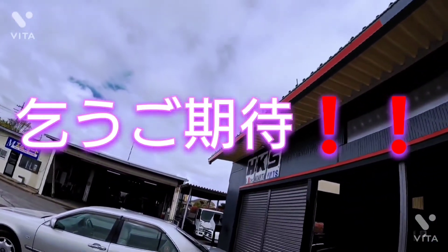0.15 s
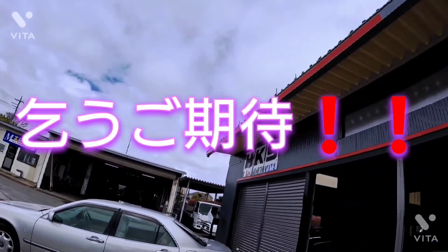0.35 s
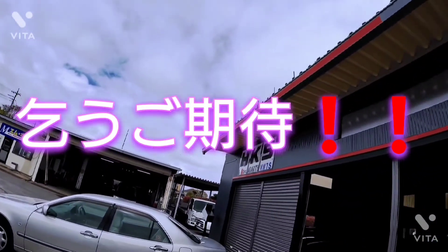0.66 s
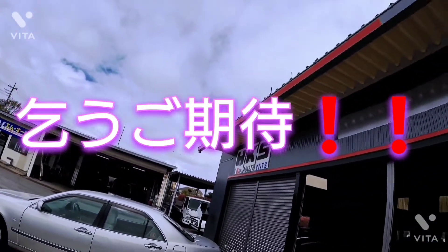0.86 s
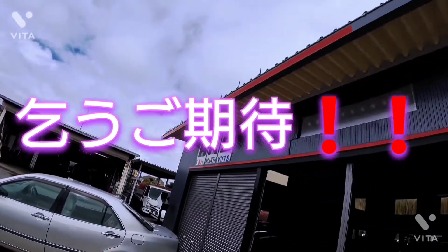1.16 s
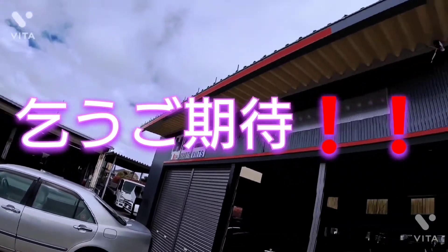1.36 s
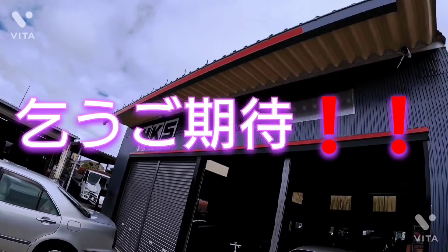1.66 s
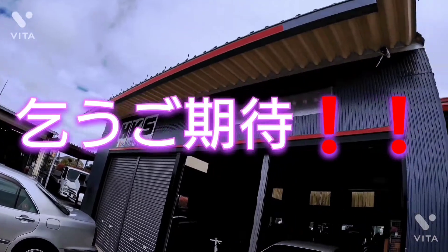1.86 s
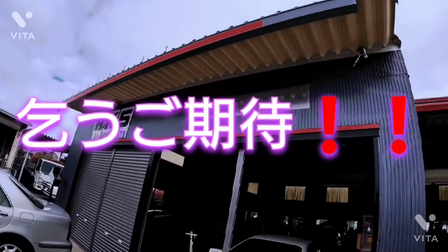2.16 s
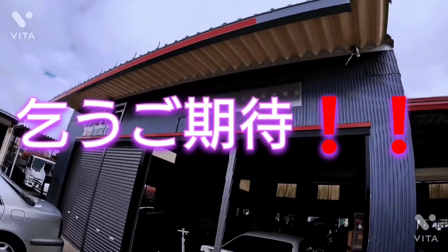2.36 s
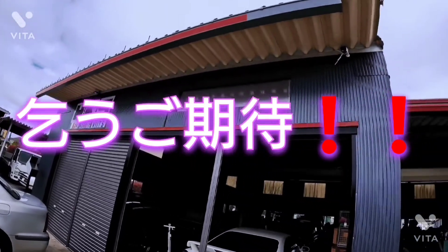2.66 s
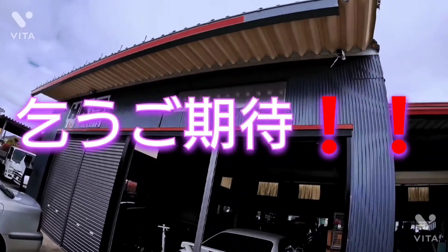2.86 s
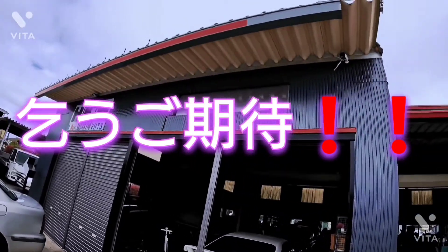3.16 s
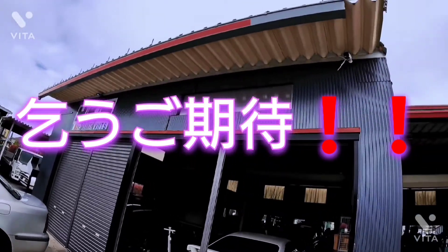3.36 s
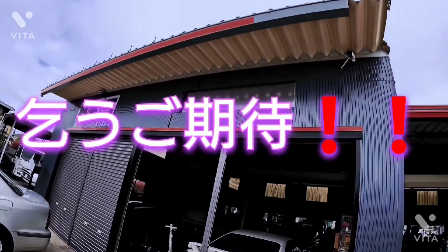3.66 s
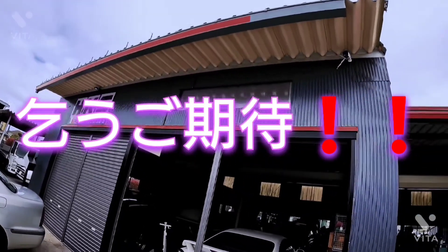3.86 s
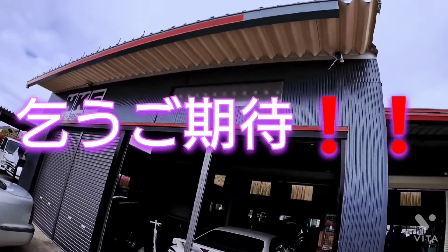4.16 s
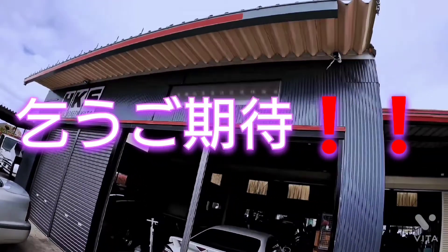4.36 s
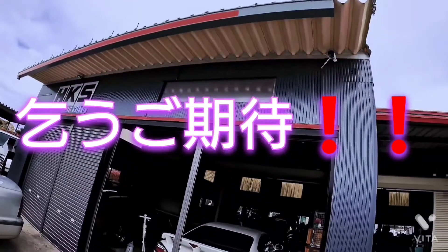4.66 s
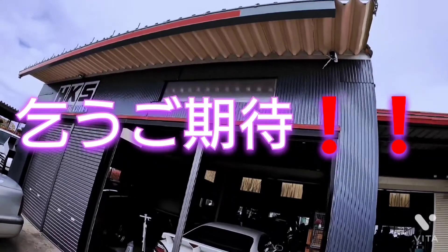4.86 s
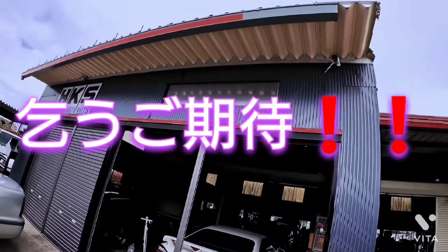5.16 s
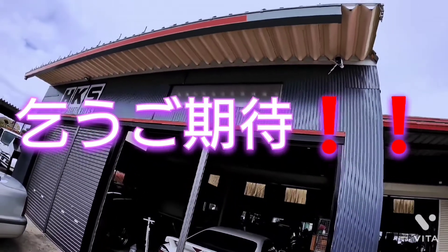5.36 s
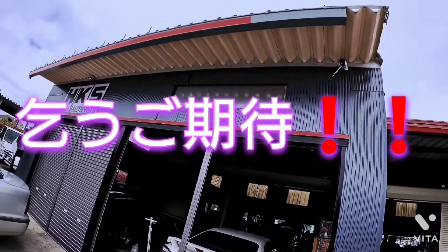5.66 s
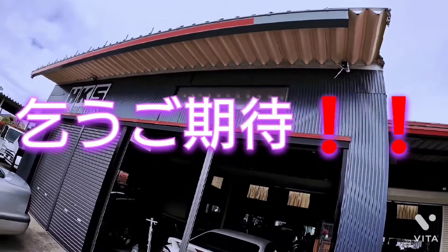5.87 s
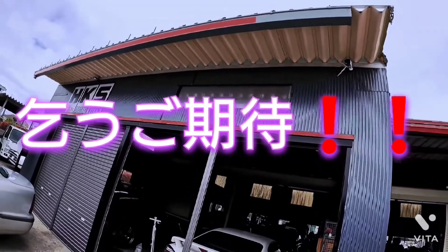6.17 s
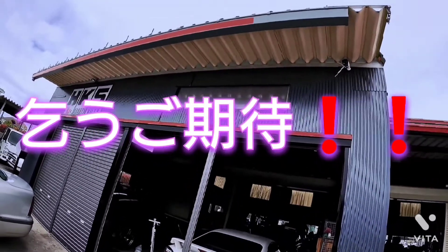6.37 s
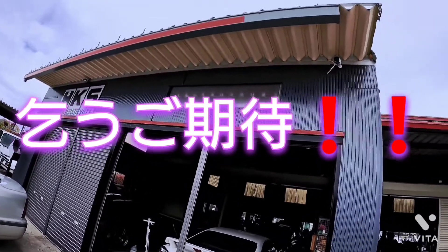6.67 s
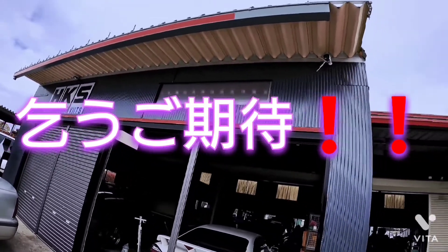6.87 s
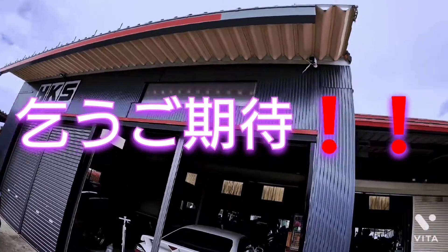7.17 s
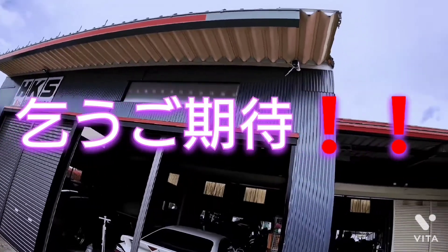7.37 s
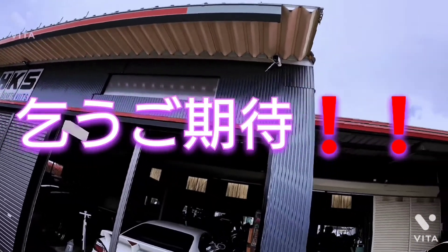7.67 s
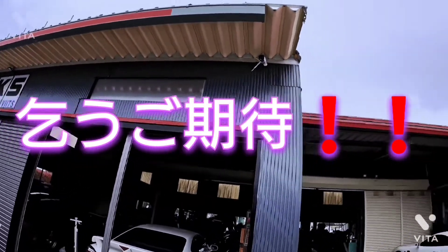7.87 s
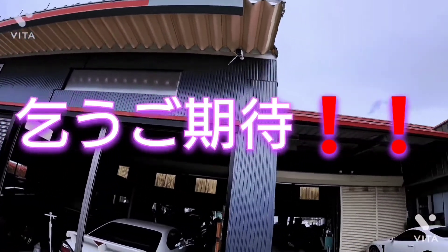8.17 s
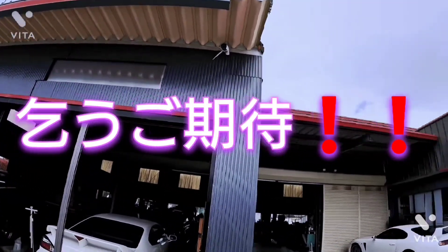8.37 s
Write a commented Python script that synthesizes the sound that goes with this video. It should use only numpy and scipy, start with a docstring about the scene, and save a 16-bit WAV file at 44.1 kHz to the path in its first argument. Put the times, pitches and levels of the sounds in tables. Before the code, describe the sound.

A car engine idles throughout, outdoors by a workshop, with a deep, even hum. Above it, quieter and slightly to the left, are a thin belt whine, ticking valves, a rushing fan and a light rattle that is clearest in the first two seconds. Short, soft hisses come at about 0.4 and 1.1 seconds, with fainter ones near 6.2 and 7.5 seconds. Wind is faint at first, bumping the microphone gently around 1.2 seconds. From about 5.3 seconds it buffets in irregular low rumbles and thumps, mostly on the right. Strong gusts with small snaps hit at about 6.4 seconds, from 7.2 to 7.8, and hardest around 8.1 to 8.2. The engine dips slightly under these gusts but keeps running. A soft swish passes at about 8.3 seconds, and the hum swells a little just before the end at 8.5 seconds.

```python
"""A deep firing hum: a six-cylinder car engine idles, with exhaust orders, belt whine, a rattling cover,
ticking valve gear and fan rush. Short hisses come early and twice more later. Wind, faint at first,
buffets the two microphone ports, the right one most: eddies rumble, thump and snap on the membrane,
and the gain control ducks under them. A soft swish comes near the end."""
import sys
import numpy as np
from scipy import signal
from scipy.fft import rfft, irfft, next_fast_len
from scipy.io import wavfile
from scipy.ndimage import uniform_filter1d, map_coordinates

SR = 44100
rng = np.random.default_rng(int(sys.argv[2]) if len(sys.argv) > 2 else 0)


def to_wav(s):
    """Save 16-bit WAV."""
    ch = np.atleast_2d(s).T  # columns
    pcm = np.round(np.clip(ch, -1, 1) * 32767)  # PCM
    wavfile.write(sys.argv[1], SR, pcm.astype(np.int16))


N = 375732


def amp(db):
    """dB to linear gain."""
    return 10 ** (np.asarray(db) / 20)


def unit_rms(x):
    """x at rms 1."""
    return x / np.sqrt(np.mean(x ** 2) + 1e-20)


def log_interp(points, hz):
    """Interpolate (freq_hz, value) rows on a log frequency axis."""
    freq_hz, values = np.transpose(points)
    return np.interp(np.log(hz + 1), np.log(freq_hz + 1), values)


def curves(rows):
    """One per-sample curve for each column after time_s."""
    time_s, *columns = np.transpose(rows)
    return [np.interp(np.arange(N) / SR, time_s, column) for column in columns]


def wobble(rate_hz):
    """Smooth random curve, rate_hz knots a second."""
    knots = rng.standard_normal(int(N * rate_hz / SR) + 4)
    coarse = np.arange(0, N + 64, 64)
    return np.interp(np.arange(N), coarse, map_coordinates(knots, [coarse * rate_hz / SR]))


def filtered(x, response):
    """Apply a complex response(hz); ends mirrored."""
    edge = SR // 4
    size = next_fast_len(N + 2 * edge)
    spectrum = rfft(np.pad(x, [(0, 0), (edge, edge)], "reflect"), size)
    return irfft(spectrum * response(np.fft.rfftfreq(size, 1 / SR)), size)[..., edge:edge + N]


def noise(spectrum, patchy_db):
    """Two independent shaped noises, rms 1, sharing time-frequency patches of random gain."""
    bins = signal.stft(rng.standard_normal((2, N)), nperseg=512)[2]
    patches = rng.standard_normal(bins.shape[1:])
    patches = uniform_filter1d(uniform_filter1d(patches, size=5, axis=0), size=5, axis=1)
    pair = signal.istft(bins * amp(patchy_db * unit_rms(patches)), nperseg=512)[1][:, :N]
    return unit_rms(filtered(pair, lambda hz: amp(log_interp(spectrum, hz))))


def resonate(x, modes):
    """Pass x twice through a resonator bank for steep skirts; rms 1."""
    def bank(hz):
        return sum(amp(db / 2) * 1j * hz * width_hz / (pitch_hz ** 2 - hz ** 2 + 1j * hz * width_hz)
                   for pitch_hz, width_hz, db in modes)
    return unit_rms(filtered(x, lambda hz: bank(hz) ** 2))


# freq_hz, left_right_coherence
COHERENCE = [(60, 1.0), (130, 1), (280, 0.97), (600, 0.87), (1300, 0.74), (2810, 0.57), (4500, 0.51),
             (6070, 0.95), (8500, 0.95), (13100, 0.93)]
# freq_hz, left_over_right_db
BALANCE = [(60, 2), (200, .5), (360, 1), (660, 2), (1200, 3.5), (2180, 4.5), (3960, 1.5), (7200, 1.5),
           (10500, 0), (12000, 31), (13600, 18)]
# freq_hz, left_lead_rad
PHASE_LEAD = [(100, 0), (600, -0.08), (1210, -0.55), (2410, -0.8), (3700, -0.25), (4650, .4), (5300, 0)]
def from_left(pair):
    """Source on the left: shared and diffuse parts, then level and phase gaps between the ports."""
    def blend(hz):
        angle = np.arccos(np.clip(log_interp(COHERENCE, hz), 0, 1)) / 2
        return np.array([np.cos(angle), np.sin(angle)])

    def gaps(hz):
        left = amp(log_interp(BALANCE, hz) / 2) * np.exp(.5j * log_interp(PHASE_LEAD, hz))
        return np.array([left, 1 / left])

    mid, side = filtered(pair, blend)
    return filtered(np.array([mid + side, mid - side]), gaps)


# shaft_order, level_db
EXHAUST_ORDERS = [(6, -60.5), (7, -54.5), (9, -55.5), (11, -64.5), (12, -61.5), (15, -60.5), (21, -57),
                  (22, -56), (24, -61), (30, -69.5), (33, -66.5), (36, -66.5), (39, -72.5), (42, -68.5),
                  (44, -69.5)]
def hum_and_exhaust(turns, hum_db):
    """Three firings a shaft turn give the hum; the exhaust orders trail them."""
    lead_turns, lag_turns = .048, .24
    gain = amp(hum_db + 1.2 * wobble(9))
    tones = gain * np.sin(2 * np.pi * 3 * (turns + lead_turns) + .1 * wobble(6))
    for order, level_db in EXHAUST_ORDERS:
        gain = amp(level_db + 1.8 * wobble(4))
        tones += gain * np.sin(2 * np.pi * order * (turns - lag_turns) + .35 * wobble(3))
    return np.sqrt(2) * tones


# pitch_hz, width_hz, level_db
BELT_MODES = [(908, 36, -8), (1085, 30, -8), (1165, 14, -7), (1184, 14, -3), (1228, 15, 0), (1245, 12, -1),
              (1274, 12, -2.5), (1384, 15, -8), (1427, 15, -6), (1498, 16, -3.5), (1700, 34, -8),
              (1918, 30, -8), (2136, 30, -8.5), (2270, 20, -11), (2376, 26, -9), (2590, 32, -14),
              (2858, 30, -12.5), (3101, 36, -12), (3750, 34, -14), (4027, 26, -13)]
def belt_whine(turns, firing, uneven):
    """Belt-driven parts sing; the belt tightens once a turn. Uneven running fades the whine."""
    tension = np.cos(2 * np.pi * (turns - .2))
    level_db = -2 - 1.75 * firing + uneven * (3 * tension - 14)
    white = noise([(100, 0)], patchy_db=1.5)
    return amp(level_db) * resonate(white, BELT_MODES)


# level_db at each sixth of a shaft turn, for unevenness 1
BLOW_DB = [0, -13, -6, -15, -15, -15]
# pitch_hz, width_hz, level_db
COVER_MODES = [(1225, 40, 0), (2378, 70, -20), (4025, 100, -25)]
# pitch_hz, width_hz, level_db
VALVE_MODES = [(2378, 60, 0), (2790, 70, -7), (3120, 70, -7), (3750, 70, -9), (4030, 60, -10)]
def rattle(turns, uneven, modes):
    """Six blows a turn ring a part through its like-tuned bracket; the walls return each blow."""
    jitter_s, echo_s = .001, .004
    step = ((turns + .94) * len(BLOW_DB)).astype(int)
    onsets = np.flatnonzero(np.diff(step))
    force_scatter, time_scatter, echo_scatter = rng.standard_normal((len(onsets), 3)).T
    pattern_db = np.take(BLOW_DB, step[onsets + 1] % len(BLOW_DB))
    force = amp(uneven[onsets] * pattern_db + .9 * force_scatter)
    force /= np.sqrt(uniform_filter1d(force ** 2, size=12))
    direct = np.clip(onsets + (jitter_s * SR * time_scatter).astype(int), 0, N - 1)
    echo = np.clip(direct + (echo_s * SR * (1 + .322 * echo_scatter)).astype(int), 0, N - 1)
    blows = np.array([np.bincount(direct, force, N), np.bincount(echo, force, N)])
    return resonate(blows, modes)


# freq_hz, density_db
FAN_SPECTRUM = [(290, -20), (500, -10), (757, -10.5), (845, -15.5), (905, -6.5), (1030, -7), (1260, -4.5),
                (1350, -8.5), (1470, -8.5), (2350, -13), (3500, -16), (3950, -17.5), (4200, -20.5),
                (4880, -26), (6520, -21), (12500, -44), (13600, -42.5)]
def fan_rush(firing, treble_db):
    """Fan and engine bay noise; the treble pulses with the valve gear."""
    def highpass(hz, corner_hz=4000):
        return hz ** 2 / (hz ** 2 + corner_hz ** 2)

    low = filtered(noise(FAN_SPECTRUM, patchy_db=1.5), lambda hz: 1 - highpass(hz))
    treble = filtered(noise(FAN_SPECTRUM, patchy_db=3), highpass)
    pulse = amp(treble_db + 1.5 * firing + .6 * wobble(6) + .66 * wobble(14))
    return low + pulse * treble


# freq_hz, density_db
DRONE_SPECTRUM = [(18, -27), (30, -7.5), (52, -14), (81, -21.5), (134, -23.5), (184, -22.5), (232, -26.5),
                  (425, -35.5), (642, -45.5), (800, -35), (1040, -90), (1760, -120)]
def body_drone(firing):
    """Low exhaust and body noise that puffs with each firing."""
    return amp(-44 + 1.5 * firing + .6 * wobble(12)) * noise(DRONE_SPECTRUM, patchy_db=1.5)


# time_s, firing_hz
FIRING_RATE = [(0, 25.3), (.6, 25.5), (1, 25.64), (2.4, 25.62), (2.8, 25.2), (3.8, 25.25), (4.2, 25.45),
               (5.4, 25.4), (5.8, 25.05), (6.4, 25.1), (7, 25.4), (8.52, 25.2)]
# time_s, hum_db, rush_db, treble_re_rush_db, unevenness
ENGINE_MIX = [(0, -30, -53.5, 0.5, 0.42), (.6, -31, -51.5, 0, 1.23), (2, -30, -51, -1, 0.83),
              (2.4, -28.5, -51.5, 0.5, 0.25), (3.7, -28.5, -51, 0.5, 0.24), (5.2, -29, -50.5, 2, 0.21),
              (6.3, -28.5, -50.5, 1.5, 0.22), (7.5, -28.5, -49.5, -0.5, 0.39), (7.75, -30, -52.5, 1, 0.52),
              (8.1, -27.5, -53, 2.5, 0.46), (8.52, -24.5, -50.5, -5.5, 0.7)]
def engine():
    """Idling six-cylinder: one shaft angle drives every part."""
    hum_db, rush_db, treble_db, uneven = curves(ENGINE_MIX)
    firing_hz, = curves(FIRING_RATE)
    turns = .057 + np.cumsum(firing_hz) / SR / 3
    firing = np.cos(2 * np.pi * 3 * turns)
    hum = hum_and_exhaust(turns, hum_db)
    whine = belt_whine(turns, firing, uneven)
    cover = amp(-15.5 + 9 * uneven) * rattle(turns, uneven, COVER_MODES)
    valves = amp(-19) * rattle(turns, np.full(N, 1.1), VALVE_MODES)
    bay = amp(rush_db) * (whine + cover + valves + fan_rush(firing, treble_db))
    return hum + from_left(bay + body_drone(firing))


# freq_hz, density_db
HISS_SPECTRUM = [(1200, -35), (2300, 1), (3500, 4), (5500, 0.5), (7500, 1.5), (10000, -4.5), (13600, -10)]
# start_s, hold_s, t60_s, level_db
HISS_BURSTS = [(0.39, 0.037, 0.32, -52.5), (.455, 0.049, 0.087, -64), (1.143, .03, 0.44, -58.5),
               (6.19, .03, .36, -65), (7.507, .03, 0.28, -62.5)]
def hisses():
    """Bright noise bursts: quick attack, hold, fast decay."""
    attack_s = .01
    t, envelope = np.arange(N) / SR, np.zeros(N)
    for start_s, hold_s, t60_s, level_db in HISS_BURSTS:
        gate = np.clip((t - start_s) / attack_s, 0, 1) * (t < start_s + 1)
        envelope += gate * amp(level_db - 60 * np.clip(t - start_s - hold_s, 0, 1) / t60_s)
    shared, diffuse = noise(HISS_SPECTRUM, patchy_db=2.5)
    return envelope * np.array([shared + .3 * diffuse, shared - .2 * diffuse])


def eddies(spectrum, shared, rate_hz):
    """Pressure lumps passing the ports, partly common to both."""
    mid, side = noise(spectrum, patchy_db=-.5)
    mid, side = shared * mid, (1 - shared) * side
    lumps = amp(1.6 * wobble(rate_hz))
    return unit_rms(lumps * np.array([mid + side, mid - side]))


# large eddies: freq_hz, density_db
RUMBLE_SPECTRUM = [(8, 0.5), (18, 7.5), (35, 12), (80, 1.5), (130, -8.5), (250, -20.5), (500, -120)]
# middle eddies: freq_hz, density_db
FLUTTER_SPECTRUM = [(30, -62), (70, -13), (130, 3.5), (220, -4), (350, -16), (600, -54), (1200, -120)]
# small eddies: freq_hz, density_db
SLAP_SPECTRUM = [(80, -61), (180, 3), (300, 8.5), (500, -2), (800, -16.5), (1200, -18.5), (2000, -75),
                 (3000, -120)]
# time_s, level_db
WIND_STRENGTH = [(0, -47), (.3, -37), (.6, -44.5), (1.1, -32.5), (1.3, -37.5), (1.45, -54), (3, -46.5),
                 (4, -52.5), (4.7, -47), (5.2, -51), (5.3, -26), (5.6, -30), (5.7, -44.5), (6.3, -45.5),
                 (6.4, -16.5), (6.6, -33), (7, -29.5), (7.1, -34.5), (7.42, -33.5), (7.55, -22.5),
                 (7.72, -27), (7.8, -41), (8.05, -25), (8.25, -22.5), (8.33, -31), (8.52, -30.5)]
def wind():
    """Three eddy sizes follow the wind and the stir of the thumps; above calm they lean right."""
    flutter_db, slap_db, calm_db, pan_db_per_db = -20, -42, -50, -.23
    wind_db, = curves(WIND_STRENGTH)
    power = amp(wind_db + np.array([[0], [flutter_db], [slap_db]])) ** 2
    rumble_gain, flutter_gain, slap_gain = np.sqrt(power + stirred_power())
    air = rumble_gain * eddies(RUMBLE_SPECTRUM, shared=.79, rate_hz=20)
    air += flutter_gain * eddies(FLUTTER_SPECTRUM, shared=.66, rate_hz=40)
    air += slap_gain * eddies(SLAP_SPECTRUM, shared=.65, rate_hz=70)
    left = np.maximum(rumble_gain / amp(calm_db), 1) ** (pan_db_per_db / 2)
    return air * np.array([left, 1 / left])


# start_s, level_db, pitch_hz, slap_re_push_db
STRONG_EDDIES = [(1.154, -29.5, 170, -30), (1.252, -28, 140, -34), (1.796, -34.5, 119, -37),
                 (5.285, -26, 34.5, -45), (5.345, -29, 112, -40), (5.446, -18.5, 68.6, -40),
                 (5.476, -17, 81.6, -46), (5.556, -23, 34, -47), (5.633, -23, 32, -47),
                 (6.385, -21.5, 105, -43), (6.43, -12, 104, -26.5), (6.459, -11, 127, -34),
                 (6.491, -13, 98, -47), (6.524, -20.5, 42, -47), (6.56, -19, 38.3, -49),
                 (6.653, -22.5, 94, -43), (6.76, -22, 114, -40), (6.825, -17, 64.6, -33),
                 (6.99, -22.5, 70, -43), (7.14, -21, 120, -54), (7.259, -13.5, 82.5, -27),
                 (7.477, -14.5, 124, -24), (7.531, -17, 111, -39), (7.585, -16, 67.7, -42),
                 (7.626, -13.5, 40, -31), (7.655, -10.5, 72.5, -32), (7.748, -21.5, 75.5, -39),
                 (7.842, -14, 82.5, -42), (7.971, -26, 80, -47), (8.051, -20, 42, -45),
                 (8.098, -8, 95.6, -20), (8.193, -22, 280, -10), (8.227, -21.5, 39.5, -22),
                 (8.447, -18.5, 96, -26)]
def thumps():
    """A strong eddy pushes the membrane in, lets it swing back and sheds a slap of small eddies."""
    push_attack_s, slap_attack_s, slap_t60_s, pan_db = .0015, .0014, .22, -6
    pan = amp([[pan_db / 2], [-pan_db / 2]])
    out, t = np.zeros((2, N + SR)), np.arange(SR // 8) / SR
    small_eddies = np.pad(noise(SLAP_SPECTRUM, patchy_db=3), [(0, 0), (0, SR)])
    for start_s, level_db, pitch_hz, slap_db in STRONG_EDDIES:
        start = round(start_s * SR)
        span = slice(start, start + len(t))
        phase = np.pi * (t * pitch_hz - .7)
        push = np.clip(t / push_attack_s, 0, 1) * (1 - 2 * phase ** 2) * np.exp(-phase ** 2)
        slap_age_s = t - .8 / pitch_hz  # starts just after the push peaks
        slap_gain = amp(slap_db - 60 * slap_age_s / slap_t60_s)
        slap_gain *= np.clip(slap_age_s / slap_attack_s, 0, 1)
        out[:, span] += amp(level_db) * (push + slap_gain * small_eddies[:, span]) * pan
    return out[:, :N]


def stirred_power():
    """Power of the rumble, flutter and slap that swell around each thump."""
    stir_db, lag_s, half_cycles, slap_half_s = -8.5, .012, 1.6, .01
    t, power = np.arange(N) / SR, np.zeros((3, N))
    for start_s, level_db, pitch_hz, slap_db in STRONG_EDDIES:
        flutter_db = -8 + 11 * np.log2(pitch_hz / 100)
        mix_db = np.array([[0], [flutter_db], [slap_db]])
        half_s = [[half_cycles / pitch_hz], [half_cycles / pitch_hz], [slap_half_s]]
        span = slice(round((start_s - .2) * SR), round((start_s + .2) * SR))
        swell = np.exp(-((t[span] - start_s - lag_s) / half_s) ** 2)
        power[:, span] += amp(level_db + stir_db + mix_db) ** 2 * swell
    return power


# centre_s, level_db, pitch_hz, half_length_cycles, left_over_right_db, left_lag_s
MEMBRANE_SNAPS = [(6.433, -20, 302, 1.2, -4, .0005), (6.468, -26.5, 269, 1.6, -11, .0005),
                  (7.2584, -27, 315, 1, -13, 0.00039), (7.4857, -23, 444, 0.95, -12.5, .0003),
                  (7.653, -26, 350, 1.5, -9, 0.00031), (7.666, -45, 445, 1, -5, 0.00062),
                  (8.113, -19, 610, 0.4, -15, 0.00022), (8.202, -15, 306, 1.9, -8.5, 0.00065),
                  (8.215, -11, 510, 0.72, -3.5, 0.00048)]
def snaps():
    """Small eddies snap on the membrane, a swing or two each."""
    out, window_s = np.zeros((2, N)), np.arange(-SR // 50, SR // 50) / SR
    for centre_s, level_db, pitch_hz, half_cycles, pan_db, lag_s in MEMBRANE_SNAPS:
        cycles = pitch_hz * (window_s - np.array([[lag_s], [0]]))
        snap = np.cos(2 * np.pi * cycles) * np.exp(-(cycles / half_cycles) ** 2)
        start = round((centre_s + window_s[0]) * SR)
        out[:, start:start + len(window_s)] += amp(level_db) * snap * amp([[pan_db / 2], [-pan_db / 2]])
    return out


# freq_hz, density_db
SWISH_SPECTRUM = [(250, -40), (500, 0), (900, 1), (1700, -5.5), (2600, -25), (5000, -80)]
def swish():
    """One soft swell of midrange noise."""
    centre_s, half_s, level_db = 8.31, .094, -47.5
    swell = np.exp(-((np.arange(N) / SR - centre_s) / half_s) ** 2)
    return amp(level_db) * swell * from_left(noise(SWISH_SPECTRUM, patchy_db=1.5))


# freq_hz, left_lead_rad
AIR_PHASE = [(130, 0), (250, -.5), (500, -1.1), (1000, -1.2)]
def scene():
    """Engine, hisses, wind and swish; small eddies reach the right port first."""
    air = wind() + thumps() + snaps()
    air = filtered(air, lambda hz: np.exp(.5j * log_interp(AIR_PHASE, hz) * np.array([[1], [-1]])))
    return engine() + hisses() + air + swish()


def record(dry):
    """Gain control ducks under the gusts, following recent power; then soft clip and band limit."""
    follow_s, threshold_db, ceiling, cutoff_hz = .35, -20.5, .42, 13700
    pole = np.exp(-1 / (follow_s * SR))
    power = signal.lfilter([1 - pole], [1, -pole], np.mean(dry ** 2, axis=0))
    ducked = dry * (1 + (power / amp(threshold_db) ** 2) ** 2) ** -.25
    clipped = ducked / (1 + (ducked / ceiling) ** 4) ** .25
    return filtered(clipped, lambda hz: 1 / (1 + (hz / cutoff_hz) ** 60))


dry = scene()
out = record(dry)
to_wav(out)
```